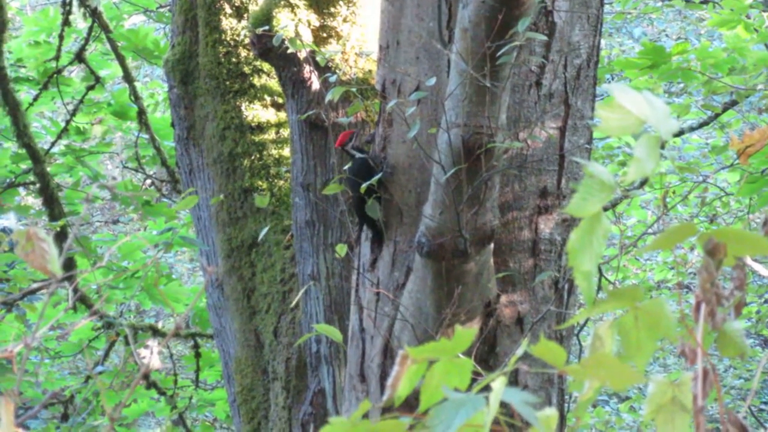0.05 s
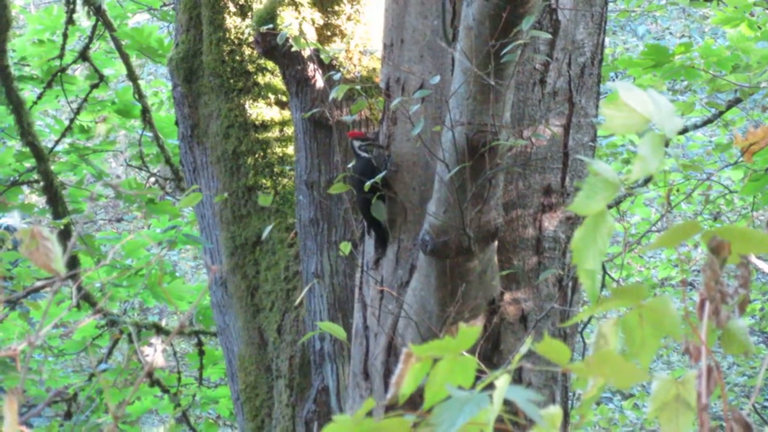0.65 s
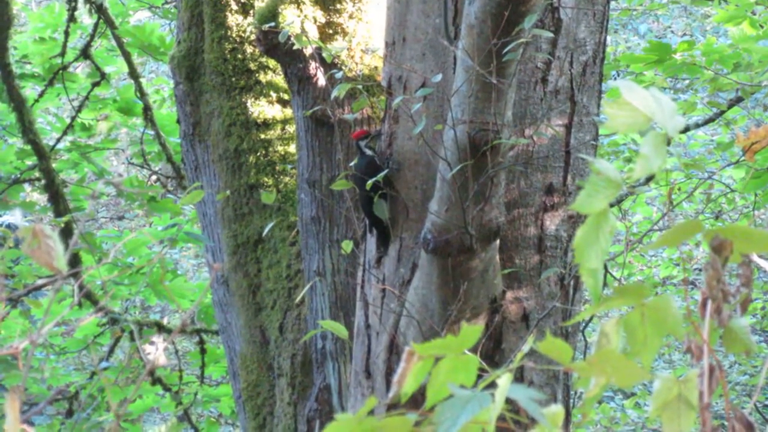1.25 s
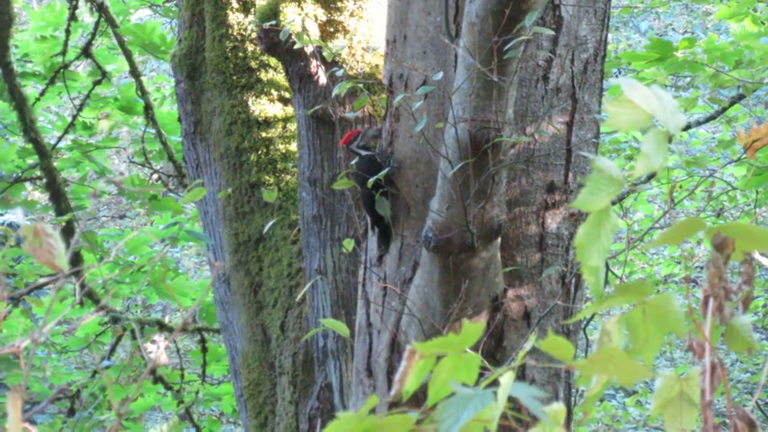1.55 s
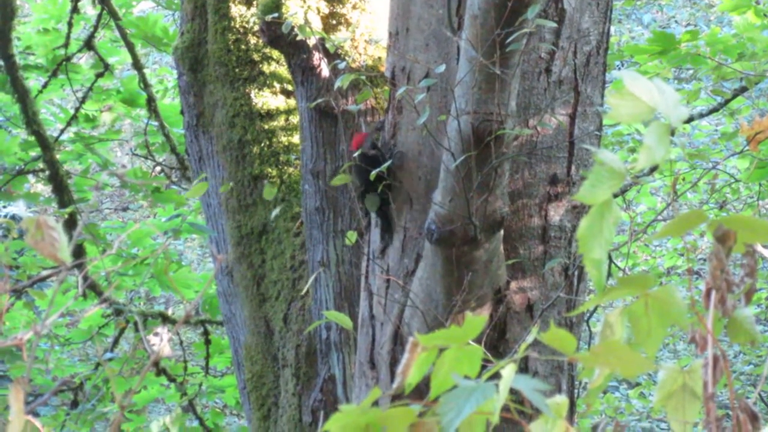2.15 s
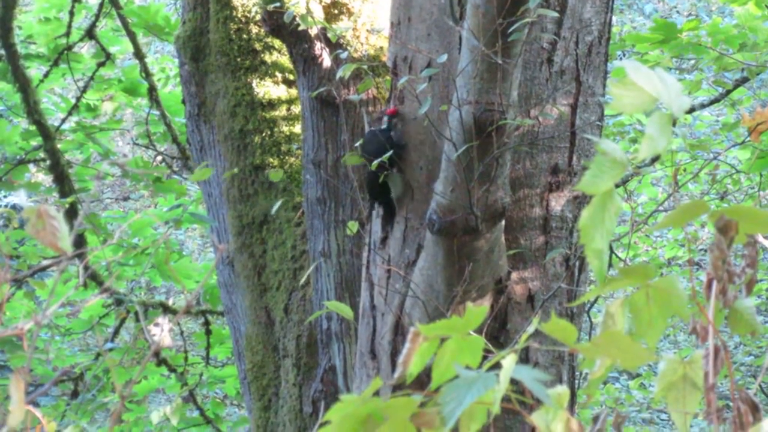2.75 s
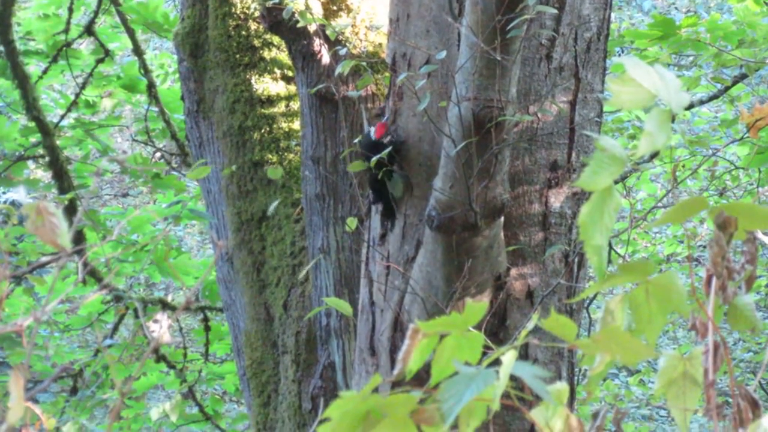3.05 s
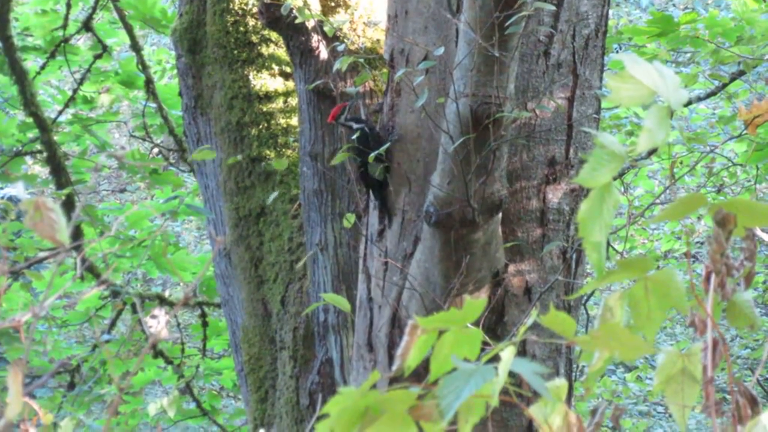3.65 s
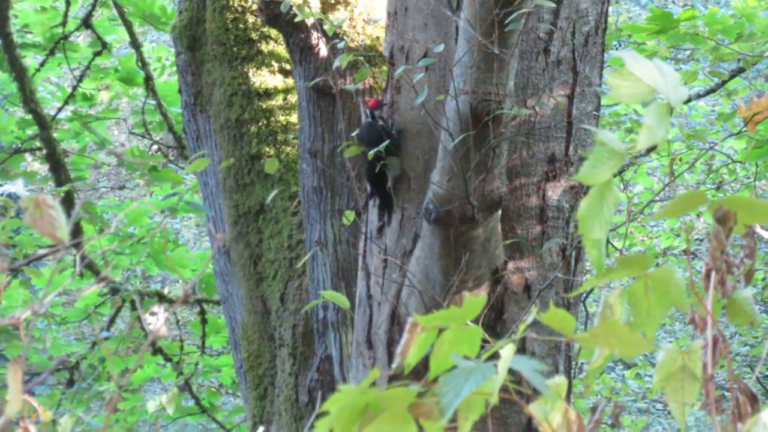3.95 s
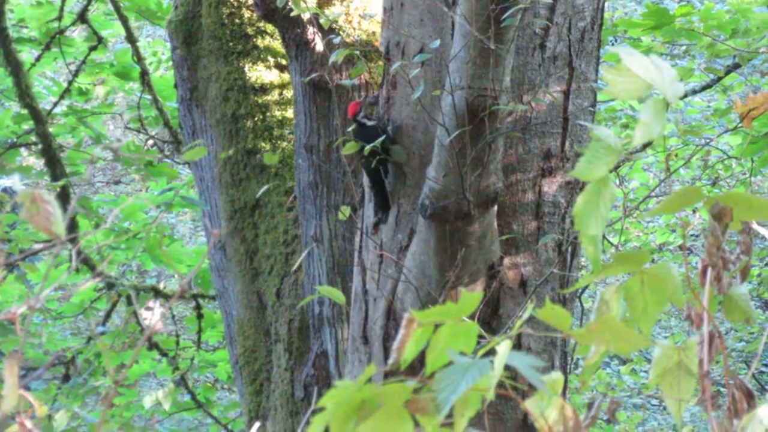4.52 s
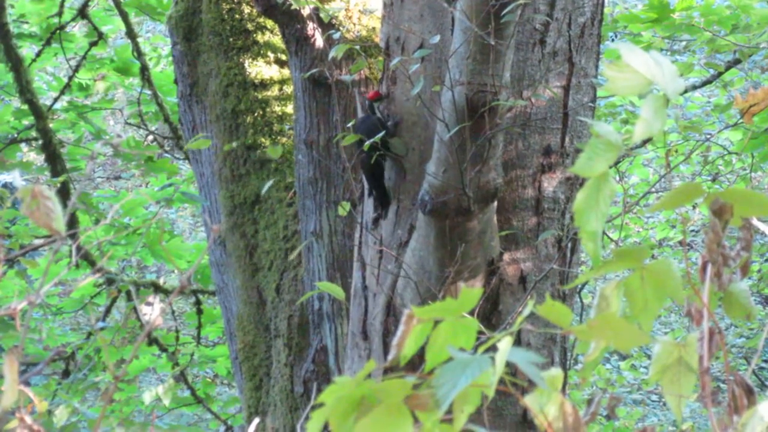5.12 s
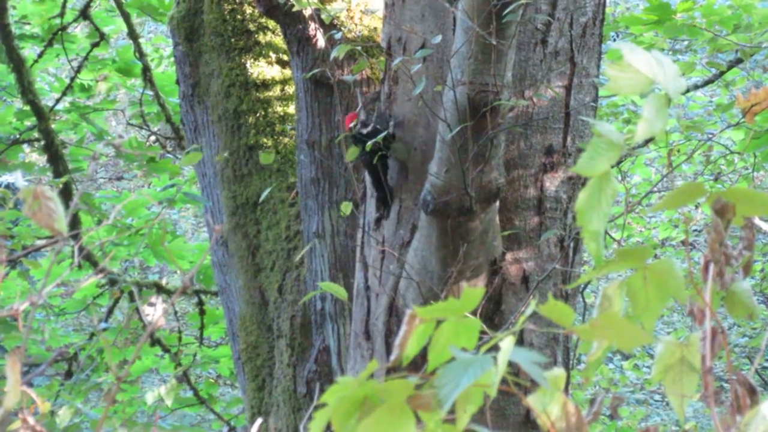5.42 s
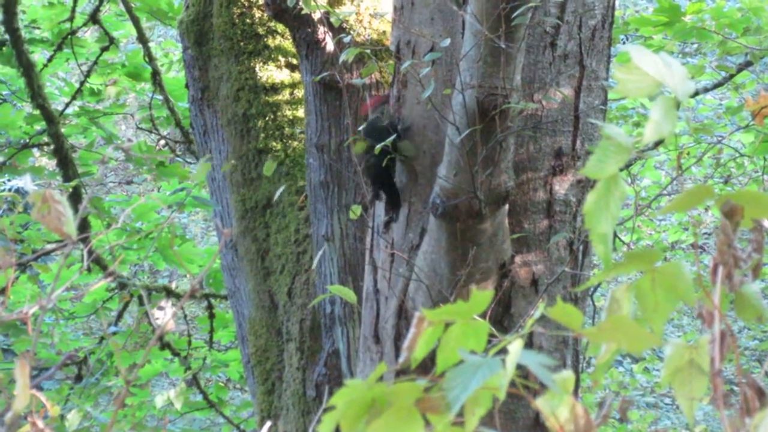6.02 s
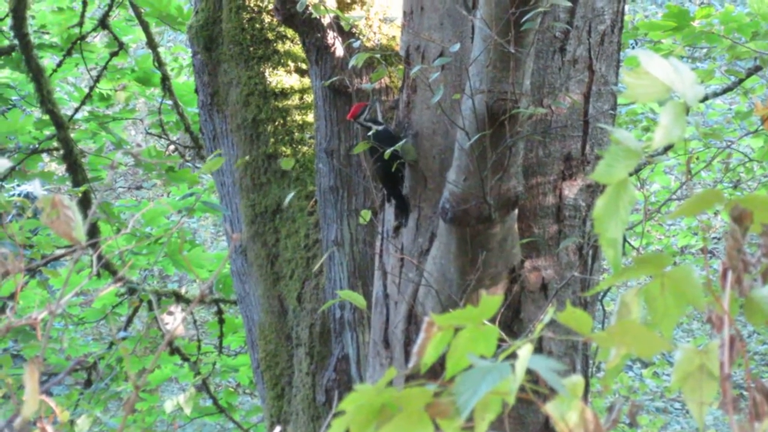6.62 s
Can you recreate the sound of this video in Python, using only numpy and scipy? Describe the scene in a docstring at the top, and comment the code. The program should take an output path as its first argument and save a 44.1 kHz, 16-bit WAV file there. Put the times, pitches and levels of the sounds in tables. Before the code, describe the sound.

A distant propeller plane drones throughout, its low hum swelling and fading over a soft rush of air, wind rumble and faint leaf hiss. Small birds whistle thinly, high in the trees. From about three seconds in, a woodpecker gives a handful of separate dry knocks on a dead trunk, growing stronger toward the end, with tiny crackles of bark. The knocks sound fairly direct, with a slight woodland echo.

```python
"""A wood. A distant propeller aircraft drones on harmonics of its blade rate, over a soft rush of air,
wind rumble and leaf hiss. Small birds whistle thinly, high in the canopy, smeared by the trees.
A woodpecker knocks a few times on a dead trunk, ringing the wood and a loose plate of bark;
bark fibres snap under its beak and claws."""
import sys
import numpy as np
from scipy import signal
from scipy.fft import rfft, irfft
from scipy.io import wavfile

SR = 44100
rng = np.random.default_rng(int(sys.argv[2]) if len(sys.argv) > 2 else 0)


def unload_wav(signal):
    """Save mono or channel-first audio to the path in sys.argv[1] as 16-bit WAV at rate SR, clipped to [-1, 1]."""
    wavfile.write(
        sys.argv[1],
        SR,
        np.round(np.clip(np.atleast_2d(signal).T, -1, 1) * 32767).astype(np.int16),
    )


N = 302967
TIME = np.arange(N) / SR


def from_db(db):
    """Decibels to gain."""
    return 10 ** (np.asarray(db) / 20)


def rms_one(x):
    """Scale to rms 1."""
    return x / np.sqrt(np.mean(np.abs(x) ** 2) + 1e-20)


def in_time(rows):
    """A (time [s], value) curve at every sample."""
    times_s, values = np.transpose(rows)
    return np.interp(TIME, times_s, values)


def drift(rate_hz):
    """Random wander below about rate_hz, rms 1."""
    hz = np.fft.rfftfreq(N, 1 / SR)
    return rms_one(irfft(rfft(rng.standard_normal(N)) / (1 + (hz / rate_hz) ** 4), N))


def coloured_noise(points):
    """Noise shaped by (frequency [Hz], density [dB]) points, rms 1."""
    hz, density_db = np.transpose(points)
    grid_hz = np.maximum(np.fft.rfftfreq(N, 1 / SR), 1)
    gain = from_db(np.interp(np.log(grid_hz), np.log(hz), density_db))
    low_cut = np.minimum(grid_hz / hz[0], 1) ** 2
    return rms_one(irfft(rfft(rng.standard_normal(N)) * gain * low_cut, N))


def band(x, low_hz, high_hz):
    """Causal band-pass."""
    sos = signal.butter(2, [low_hz, high_hz], "band", fs=SR, output="sos")
    return signal.sosfilt(sos, x + 1e-18)


def add(out, at_s, sound):
    """Mix a sound in at at_s."""
    start = round(at_s * SR)
    out[start:start + len(sound)] += sound[:N - start]


def partial(phase, scatter, flutter_hz):
    """One propeller partial: a clean line plus a share scattered by moving air, rms 1."""
    path = rms_one(1 + scatter * (drift(flutter_hz) + 1j * drift(flutter_hz)))
    return np.sqrt(2) * np.real(path * np.exp(1j * (phase + 2 * np.pi * rng.random())))


def aircraft(fade_db=0.6, fade_hz=3.5, sag_db_per_s=1.5):
    """Blade-rate harmonics: the strong overtones swell and fade in moving air, the weak ones die away."""
    # propeller: (time [s], blade rate [Hz])
    blade_rate = [(0.0, 62.1), (1.59, 62.22), (2.12, 63.14), (3.0, 63.9), (4.99, 64.28), (5.89, 64),
                  (6.22, 63.14), (6.87, 62.5)]
    # levels of harmonic 2 (hum), then harmonics 4, 5 and 7: (time [s], level [dB])
    hum_level = [(0.0, -39), (0.23, -29), (0.4, -47), (0.5, -31.5), (0.86, -30), (1.05, -33), (1.13, -24.5),
                 (1.24, -28.5), (2.35, -25.5), (2.43, -28), (3.86, -21.5), (4.06, -26.5), (4.5, -20.5),
                 (5.19, -26), (5.78, -24.5), (6.06, -39), (6.18, -28), (6.87, -28)]
    fourth_level = [(0, -45), (0.4, -30), (2.3, -37), (2.9, -42.5), (3.25, -37), (3.8, -45.5), (4.0, -34),
                    (5.1, -33), (6.15, -39), (6.87, -42)]
    fifth_level = [(0, -37), (0.8, -42.5), (1.45, -33.5), (1.9, -39), (2.9, -40), (3.9, -40), (5.1, -29),
                   (5.5, -35.5), (6.08, -32), (6.35, -50.5)]
    seventh_level = [(0, -44.5), (0.75, -33.5), (2.2, -42.5), (2.45, -33), (3.0, -43), (3.7, -42),
                     (5.3, -44.5), (5.85, -39), (6.4, -46)]
    # weak harmonics: (order [x blade rate], starting level [dB])
    weak_orders = [(3, -40.5), (6, -54.5), (9, -48.5), (11, -51), (12, -46.5)]
    phase = 2 * np.pi * np.cumsum(in_time(blade_rate)) / SR
    throb = from_db(-44.5) * partial(phase, scatter=0.21, flutter_hz=4)
    hum = from_db(in_time(hum_level) + 0.23) * partial(2 * phase, scatter=0.13, flutter_hz=6.1)
    out = throb + hum
    for order, level in ((4, fourth_level), (5, fifth_level), (7, seventh_level)):
        gain = from_db(in_time(level) + fade_db * drift(fade_hz))
        out += gain * partial(order * phase, scatter=0.39, flutter_hz=14.3)
    for order, start_db in weak_orders:
        gain = from_db(start_db - sag_db_per_s * TIME)
        out += gain * partial(order * phase, scatter=0.23, flutter_hz=7.8)
    return out


def air(sag_db_per_s=0.14):
    """The aircraft's rush wavers and slowly recedes; wind rumbles low and leaves hiss evenly."""
    # spectra: (frequency [Hz], relative density [dB])
    rush_colour = [(80, -2), (160, -2), (280, 0.5), (400, -0.5), (680, -4), (900, -5), (1400, -13),
                   (2000, -22.5), (3000, -28), (6000, -63)]
    hollow_colour = [(300, -21.5), (520, -3), (640, 15.5), (760, 9), (900, -14), (1500, -33), (3000, -72)]
    wind_colour = [(25, -13), (50, -3), (80, -1.5), (130, -4), (300, -35), (1000, -69)]
    leaf_colour = [(1500, 6.5), (2700, 1), (4200, -0.5), (6300, -1.5), (9000, -4), (11000, -8),
                   (15000, -14)]
    # hollow band of the rush, coming and going: (time [s], level [dB])
    hollow_level = [(0, -48), (1.2, -44), (3.1, -50), (3.75, -38), (4.3, -44.5), (5.6, -44), (6.87, -68)]
    # wind rumble: (time [s], level [dB])
    wind_level = [(0, -46.5), (4.2, -48.5), (6.87, -43)]
    rush_db = -37.5 - sag_db_per_s * TIME + 0.5 * drift(rate_hz=8.1)
    rush = from_db(rush_db) * coloured_noise(rush_colour)
    hollow = from_db(in_time(hollow_level)) * coloured_noise(hollow_colour)
    rumble = from_db(in_time(wind_level)) * coloured_noise(wind_colour)
    hiss = from_db(-58.5) * coloured_noise(leaf_colour)
    return rush + hollow + rumble + hiss


def songbirds(warble_hz=130):
    """Near-sine whistles that swell, warble quickly and fade, heard mostly by way of the trees."""
    # notes: (time [s], length [s], start [Hz], end [Hz], rms warble [Hz], relative level [dB])
    whistles = [(0.264, 0.46, 8250, 9000, 229, -64), (0.459, 0.48, 8650, 8400, 300, -66),
                (1.006, 0.22, 8460, 7960, 180, -65), (2.451, 0.45, 8604, 8380, 226, -56.5),
                (2.658, 0.72, 8280, 7530, 120, -57), (3.12, 0.41, 7860, 7810, 266, -56.5),
                (2.839, 0.69, 6980, 5370, 803, -66.5), (4.057, 0.24, 5600, 5800, 750, -62.5),
                (4.121, 0.32, 6900, 6230, 299, -63), (5.35, .20, 8150, 8170, 230, -65),
                (5.98, 0.11, 8400, 8500, 170, -68), (6.176, 0.25, 8200, 8100, 80, -64),
                (6.56, .12, 9550, 9650, 120, -72)]
    out = np.zeros(N)
    for at_s, length_s, start_hz, end_hz, depth_hz, db in whistles:
        progress = np.linspace(0, 1, int(length_s * SR))
        glide_hz = start_hz + (end_hz - start_hz) * progress
        pitch_hz = glide_hz + depth_hz * drift(warble_hz)[:len(progress)]
        tone = np.sin(2 * np.pi * np.cumsum(pitch_hz) / SR)
        swell = np.sin(np.pi * progress) ** 2
        add(out, at_s, from_db(db) * rms_one(swell * tone))
    return from_db(-5.5) * out + from_db(-2.0) * forest(out, t60_s=0.94, build_s=0.0042)


def forest(x, t60_s, build_s):
    """Scatter from many trunks: a unit-energy response that builds up, then dies away."""
    t = np.arange(SR) / SR
    echoes = rng.standard_normal(SR) * from_db(1.4 * rng.standard_normal(SR) - 60 * t / t60_s)
    echoes *= 1 - np.exp(-t / build_s)
    return signal.fftconvolve(x, echoes / np.linalg.norm(echoes))[:N]


def bark(snaps_per_s=2200):
    """Fibres snap in quick showers of tiny clicks that fade."""
    # bark crumbling under beak and claws: (time [s], length [s], level [dB])
    crumbles = [(2.029, 0.05, -63), (2.116, 0.086, -62.5), (3.929, 0.24, -64.5), (5.607, 0.2, -63.5),
                (6.128, 0.13, -58), (6.769, .09, -64)]
    out = np.zeros(N)
    for at_s, length_s, db in crumbles:
        n = int(length_s * SR)
        progress = np.linspace(0, 1, n)
        envelope = np.sqrt(progress) * (1 - progress) ** 2.2
        snaps = (rng.random(n) < snaps_per_s / SR) * rng.standard_normal(n)
        add(out, at_s, from_db(db) * rms_one(band(snaps, 3830, 8300) * envelope))
    return out


def ring(modes, t):
    """Struck modes dying away, each a little stronger or weaker from blow to blow."""
    return sum(from_db(db + rng.normal(0, 1) - 60 * t / t60_s) * np.sin(2 * np.pi * hz * t)
               for hz, db, t60_s in modes)


def pecks(contact_s=0.0012, bite_s=0.00088, fibre_s=0.00048, crunch=0.64):
    """The beak crunches into bark; light taps sound the loose plate, heavy blows the trunk behind it."""
    # beak strikes: (time [s], trunk gain [dB], plate gain [dB], tick gain [dB], tick top [Hz])
    blows = [(2.8312, -22, -9.5, -23, 15000), (3.1908, -19, -6.5, -23, 15000),
             (4.3120, -13.5, -4, -23.5, 14000), (5.0333, -7, -8, -26.5, 10000),
             (5.5903, -3, -6.5, -21.5, 8500), (5.6474, -28, -31, -25, 4500),
             (5.6652, -44, -32, -27.5, 15000), (6.1215, -5, -18, -10.5, 15000),
             (6.136, -41, -33, -30, 8500), (6.18, -35, -11, -24, 4500), (6.2643, -38, -14, -25, 9050)]
    # bark plate over a hollow, trunk, beak on bark: (frequency [Hz], relative level [dB], t60 [s])
    plate_modes = [(753, -2.5, 0.013), (1760, -16.5, 0.009)]
    trunk_modes = [(305, -8.5, 0.023), (520, 12.5, 0.0076), (1296, -3.5, 0.01), (1615, -3.5, 0.01),
                   (1790, -10.5, 0.0099), (2580, -16, 0.0086)]
    tick_modes = [(2640, 1.5, 0.004), (3200, -3, 0.0051), (3940, -5.5, 0.0047), (5030, -2, 0.0033),
                  (6200, -3, 0.0039), (7700, -12.5, 0.0049), (9840, -9.5, 0.0033), (13300, -18.5, .002)]
    out = np.zeros(N)
    t = np.arange(SR // 10) / SR
    for at_s, trunk_db, plate_db, tick_db, top_hz in blows:
        plate = from_db(plate_db) * ring(plate_modes, t)
        trunk = from_db(trunk_db) * ring(trunk_modes, t)
        # plate and trunk swing against each other; soft wood rounds the attack
        knock = (plate - trunk) * (1 - np.exp(-t / contact_s)) ** 2
        # the tip digs in, fibres give way
        tip = ring(tick_modes, t) * (1 - np.exp(-t / bite_s))
        fibres = rng.standard_normal(len(t)) * np.exp(-t / fibre_s)
        tick = tip + crunch * signal.fftconvolve(fibres / np.linalg.norm(fibres), tip)[:len(t)]
        add(out, at_s, knock + from_db(tick_db) * band(tick, 2000, top_hz))
    return out


def scene():
    """Mono mix. The woodpecker is nearly dry; the trees scatter back only its middle and treble."""
    woodpecker = pecks() + bark()
    echo = from_db(-6.0) * forest(band(woodpecker, 500, 8700), t60_s=0.57, build_s=0.0026)
    return (woodpecker + echo + aircraft() + air() + songbirds())[None]


def record(dry, cutoff_hz=15100):
    """Steep low-pass."""
    return signal.sosfilt(signal.ellip(10, 0.1, 80, cutoff_hz, fs=SR, output="sos"), dry)


dry = scene()
out = record(dry)
unload_wav(out)
```